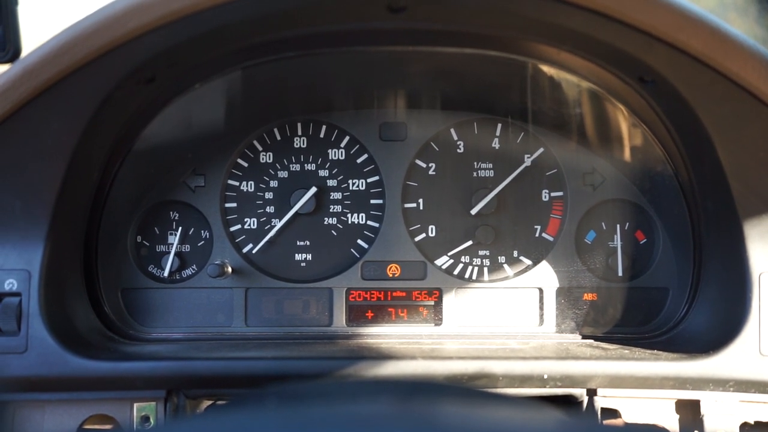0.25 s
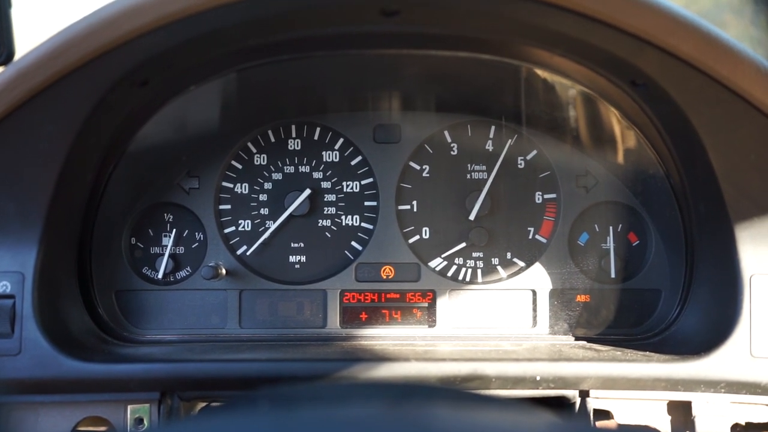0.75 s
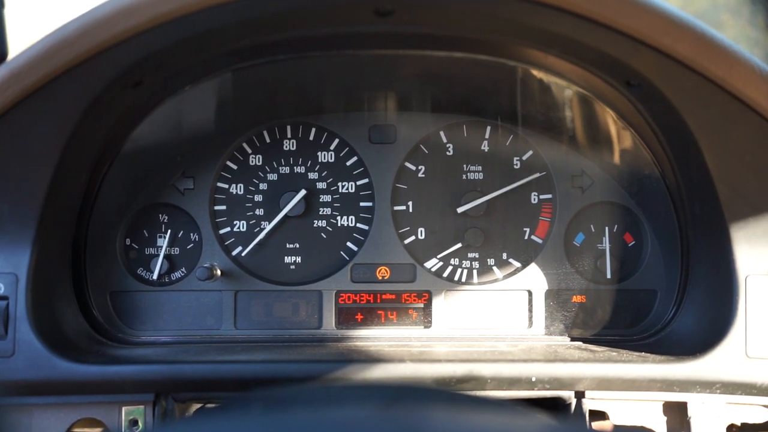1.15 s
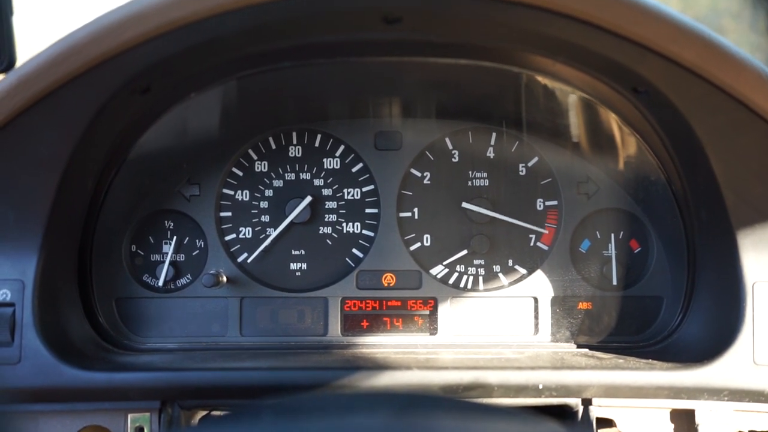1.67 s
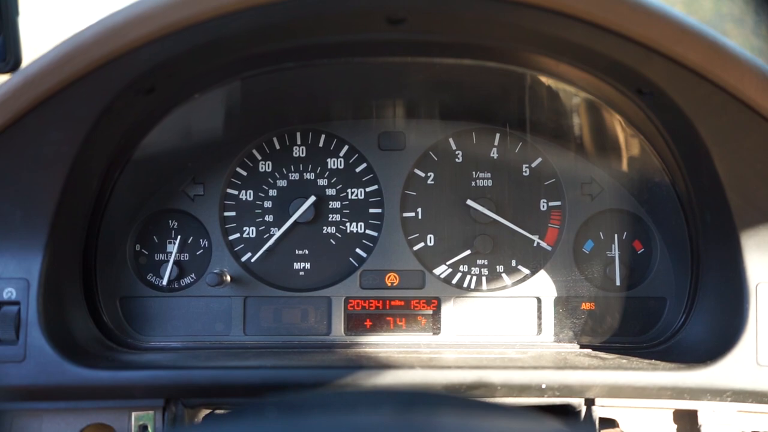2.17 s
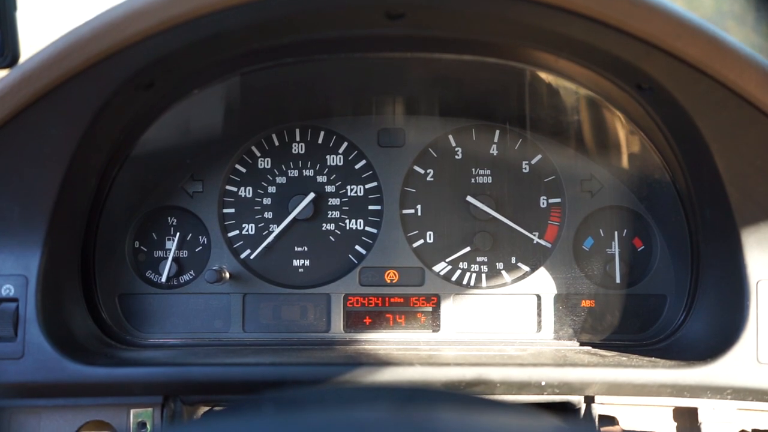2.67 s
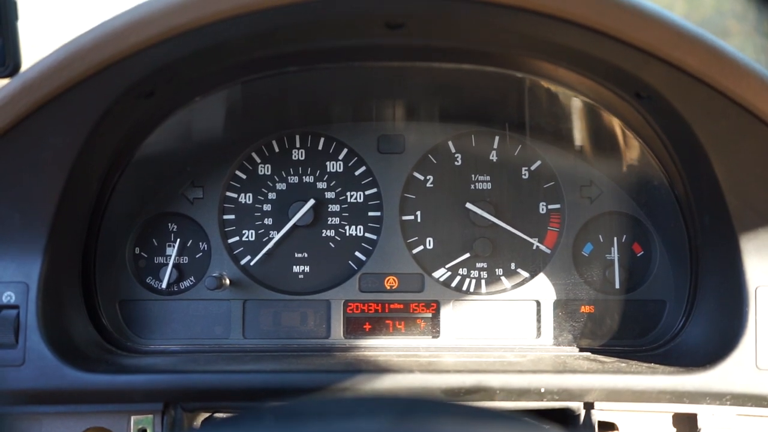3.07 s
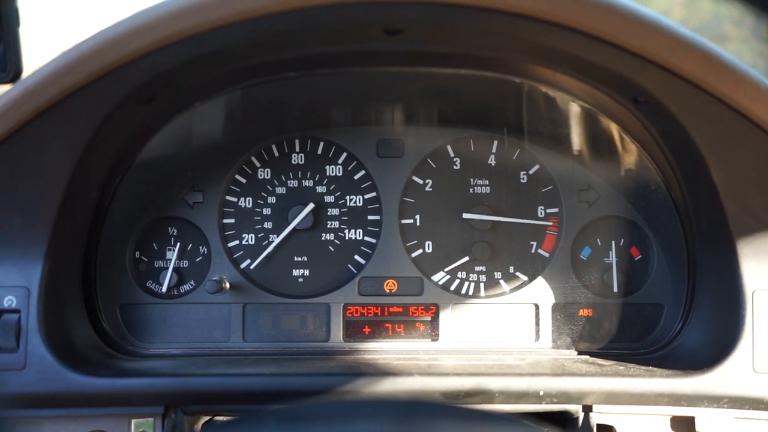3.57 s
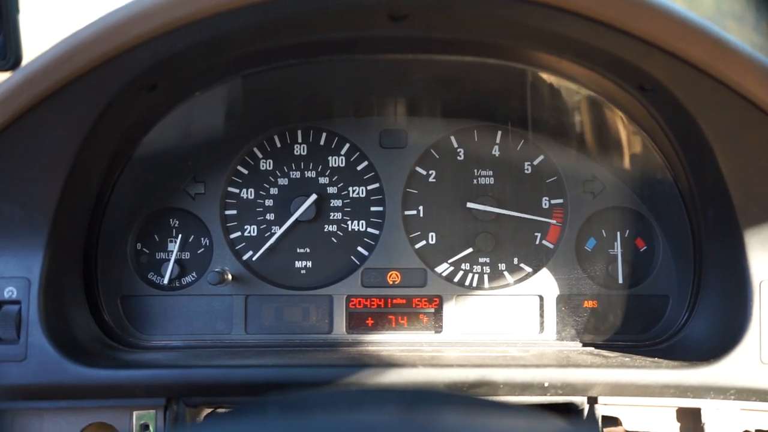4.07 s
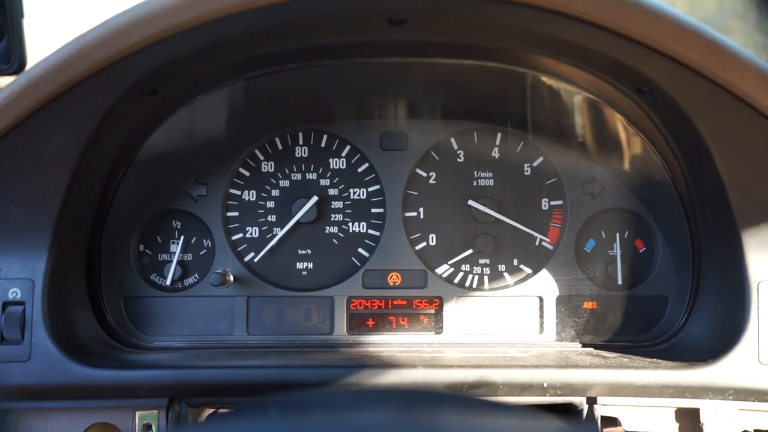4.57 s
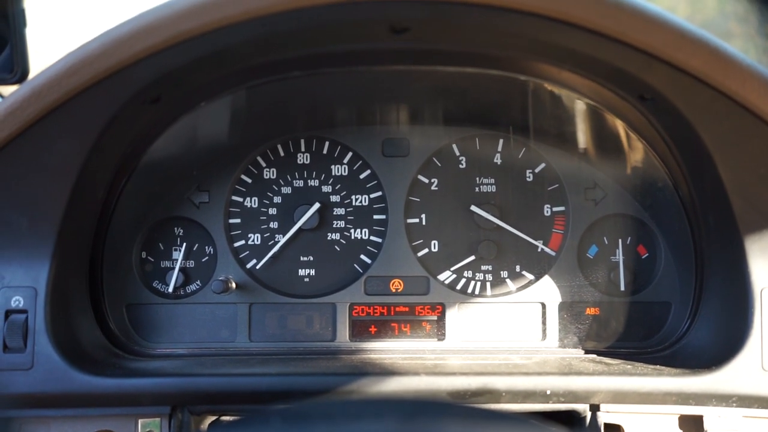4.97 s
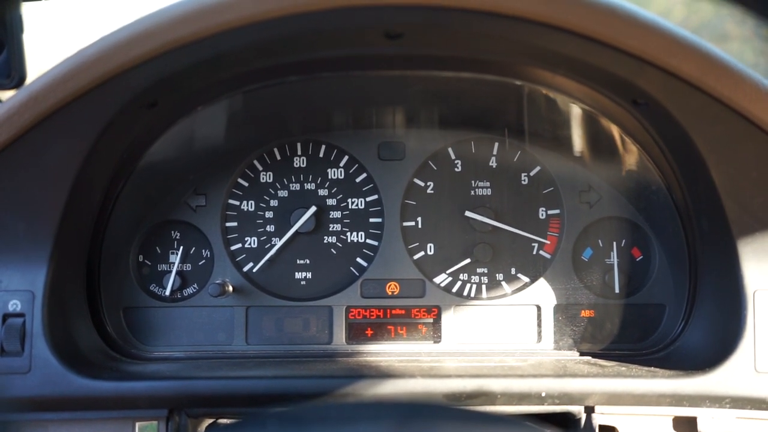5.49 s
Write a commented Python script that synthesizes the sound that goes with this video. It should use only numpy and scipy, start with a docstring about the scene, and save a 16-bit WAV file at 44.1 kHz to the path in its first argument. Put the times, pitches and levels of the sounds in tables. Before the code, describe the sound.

Heard from the driver's seat of a parked car, a loud six-cylinder engine coasts down briefly, burbles, then roars up to a long rapid stutter at the rev limiter. It sags, climbs back for another second of hammering, dips slightly and bounces again. Close cabin stereo, boomy bass, raspy exhaust and airy hiss.

```python
"""A straight-six with a loud exhaust is revved at standstill, heard from the driver's seat.
Sines at multiples of the engine's cycle rate make its note; shaped noise makes rasp and intake hiss.
Three times it falls on a closed throttle, climbs again and bounces off the rev limiter: there each
fuel cut thumps and each catch barks, as clicks that set exhaust and cabin resonances ringing.
Faint ticks and a low rumble, both of noise, lie beneath."""
import sys
import numpy as np
from scipy import signal
from scipy.fft import rfft, irfft, next_fast_len
from scipy.io import wavfile

SR = 44100
rng = np.random.default_rng(int(sys.argv[2]) if len(sys.argv) > 2 else 0)


def generate_wav(signal):
    """Clip the signal to [-1, 1] and save it as 16-bit WAV at the path in sys.argv[1]."""
    frames = np.transpose(np.atleast_2d(signal))
    scaled = np.clip(frames, -1, 1) * 32767
    pcm = np.round(scaled).astype(np.int16)
    wavfile.write(sys.argv[1], SR, pcm)


N = 252693
TIME = np.arange(N) / SR   # seconds

# Exhaust burbles as the throttle reopens. Each row: time in seconds, level in dB against a fuel cut.
BURBLES = [(.471, -3.5), (0.509, -0.5), (3.517, -11), (3.559, -2.5), (3.578, -6), (5.276, -7),
           (5.328, -3.5)]
# How wide the sound is at each pitch. Each row: pitch in Hz, side level minus middle level in dB.
WIDTH = [(30, -21), (125, -16), (300, -12), (600, -6), (1200, -3), (2200, 2), (4000, -.5), (15000, 0)]
# Stabs of the accelerator. Each row: fuel returns, throttle opens, first fuel cut and throttle closes,
# all in seconds, then limiter period in seconds, opening roar in dB.
STABS = [(.43, 0.529, 1.049, 2.89, .0638, 6.5), (3.53, 3.595, 3.856, 4.925, .0655, 0.5),
         (5.27, 5.322, 5.491, 5.75, .071, -1.5)]

# Four-stroke cycles per second at the start and on the limiter
START_HZ, LIMIT_HZ = 38.5, 58.6
# Rate at which the unfuelled engine's speed dies away, per second
DRAG_PER_S = 0.375
# The crank picks up this long after the throttle opens; the limiter acts this long after top speed
PICKUP_S, LIMITER_WAIT_S = 0.02, 0.02
# Unsteadiness as a share of crank speed: always, extra on the limiter, extra at a burble
WOBBLE, LIMITER_WOBBLE, BURBLE_WOBBLE = 0.0014, 0.00697, 0.0251
# Load from 0 to 1 when coasting, pulling freely and on the limiter, and the time it takes to follow
COAST_LOAD, PULL_LOAD, LIMITER_LOAD, LOAD_LAG_S = 0.31, 0.77, 0.54, 0.027

# Each bounce is a short burn ended by a fuel cut: its usual length, timing scatter and shortest length
BURN_S, CATCH_JITTER_S, CUT_JITTER_S, SHORTEST_BURN_S = 0.025, 0.0055, 0.004, 0.008
# Strength of an ordinary catch and its scatter
BARK_DB, BARK_SCATTER_DB = -2, 2.5

# A throttle snapped open roars loudest after this long; shares of that roar in each layer
ROAR_S, ROAR_IN_RASP, ROAR_IN_ORDERS, ROAR_IN_HISS = 0.075, 0.86, 0.8, 0.34
# Rasp: level at top speed without load, gain at full power, gain per octave of speed
RASP_DB, RASP_POWER_DB, RASP_DB_PER_OCTAVE = -42.5, 24, -1.5
# Intake hiss: level at top speed without load, gain at full load, gain per octave of speed
HISS_DB, HISS_LOAD_DB, HISS_DB_PER_OCTAVE = -49, 8, 8
# How strongly the alternation of burn and fuel cut moves the rasp and the firing note
RASP_CHOP_DB, FIRING_CHOP_DB = 5.5, 7

# Sound waves per cycle: one three-cylinder bank, and all six cylinders
ORDER_BANK, ORDER_FIRING = 3, 6
# What the boom and the firing note gain from no load to full load
BOOM_LOAD_DB, FIRING_LOAD_DB = 4.5, 17
# How far bank orders stand out: always, extra in the treble, at full load in the bass and in the treble
BANK_DB, BANK_TREBLE_DB, BANK_LOAD_DB, BANK_TREBLE_LOAD_DB = 3.5, 3.5, 11, 1

RIGHT_LAG = 5       # samples by which the sound reaches the right side later
CUTOFF_HZ = 15760   # top of the finished sound
FADE_IN_S = 0.004   # avoids a click at the start


def from_db(db):
    """Turn decibels into a gain."""
    return 10 ** (np.asarray(db) / 20)


def rms_one(x):
    """Scale to an rms (average strength) of 1."""
    return x / np.sqrt(np.mean(x ** 2) + 1e-20)


def at_hz(points, hz):
    """Read a table of pitch and value, with pitch on a log scale."""
    known_hz, value = np.transpose(points)
    return np.interp(np.log(hz), np.log(known_hz), value)


def drift(rate):
    """Smooth random wander of spread 1; a higher rate wanders faster."""
    step = 40   # samples between the computed points
    r = np.exp(-2 * np.pi * step * rate / SR)
    noise = rng.standard_normal(N // step + 2002)
    slow = signal.lfilter([1], [1, -2 * r, r * r], noise)[2000:]   # drop the filter's settling
    return np.interp(np.arange(N) / step, np.arange(len(slow)), rms_one(slow))


def lag(x, seconds):
    """Follow a signal with a delay that dies away exponentially."""
    r = np.exp(-1 / (seconds * SR))
    return signal.lfilter([1 - r], [1, -r], x + 1e-18)


def clicks(times, gains):
    """Place single-sample clicks at the given times."""
    at = np.clip(np.round(np.asarray(times) * SR).astype(int), 0, N - 1)
    return np.bincount(at, gains * np.ones(len(at)), N)


def ring(kicks, hz, t60):
    """A click of height 1 sets a sine of height 1 ringing, which falls by 60 dB in t60 seconds."""
    r = np.exp(-np.log(1000) / (t60 * SR))
    w = 2 * np.pi * hz / SR
    return signal.lfilter([0, np.sin(w)], [1, -2 * r * np.cos(w), r * r], kicks + 1e-18)


def tone(turns, apart):
    """A sine of rms 1 whose phase differs between the ears."""
    phase = 2 * np.pi * (turns % 1) + apart * np.array([[1], [-1]])
    return np.sqrt(2) * np.cos(phase.astype(np.float32))


def cabin_noise(spectrum, gate=1, lift_db=np.zeros_like):
    """Gated noise, coloured by a spectrum and resonances; the cabin spreads its treble between the ears."""
    size = next_fast_len(N)
    hz = np.maximum(np.fft.rfftfreq(size, 1 / SR), 1)
    lowest_hz, highest_hz = spectrum[0][0], spectrum[-1][0]
    skirts = np.minimum(1, np.minimum(hz / lowest_hz, highest_hz / hz)) ** 4   # fade beyond the table
    colour = from_db(at_hz(spectrum, hz) + lift_db(hz)) * skirts
    mid, side = rfft(rng.standard_normal((2, N)) * gate, size) * colour
    mid = irfft(mid, size)[:N]
    side = irfft(side * from_db(at_hz(WIDTH, hz)), size)[:N]
    return (mid + side * [[1], [-1]]) / np.std(mid)


def pipe_lift_db(hz):
    """Fixed pipe resonances lift whatever glides through them."""
    # Each row: centre in Hz, width in Hz, lift in dB.
    rasp_peaks = [(906, 66, 5.5), (1069, 78, 4), (1229.4, 33, 9), (1497, 130, 5.5), (1800, 61, 4.5)]
    return sum(db / (1 + (2 * (hz - centre) / width) ** 2) for centre, width, db in rasp_peaks)


def crank_speed():
    """The engine coasts down against drag, hangs as fuel returns, then climbs evenly to the limiter."""
    speed = START_HZ * np.exp(-DRAG_PER_S * TIME)
    for fuelled, opens, first_cut, closes, _, _ in STABS:
        caught_hz = np.interp(fuelled, TIME, speed)
        climb = np.interp(TIME, [opens + PICKUP_S, first_cut - LIMITER_WAIT_S], [caught_hz, LIMIT_HZ])
        coast = np.exp(-DRAG_PER_S * np.maximum(TIME - closes, 0))
        speed = np.where(TIME < fuelled, speed, climb * coast)
    return speed


def engine_load():
    """Load is high during a climb, held back by the limiter, low on a closed throttle."""
    extra = np.zeros(N)
    for _, opens, first_cut, closes, _, _ in STABS:
        extra[(TIME > opens) & (TIME < first_cut)] = PULL_LOAD - COAST_LOAD
        extra[(TIME >= first_cut) & (TIME < closes)] = LIMITER_LOAD - COAST_LOAD
    return COAST_LOAD + lag(extra, LOAD_LAG_S)


def opening_roar_db():
    """A throttle snapped open roars at once and settles again."""
    level_db = 0
    for _, opens, _, _, _, roar_db in STABS:
        age = (np.maximum(TIME - opens, 0) / ROAR_S) ** 2.3
        level_db = level_db + roar_db * age * np.exp(1 - age)
    return level_db


def on_limiter():
    """One while the limiter acts, otherwise zero."""
    return sum((TIME > first_cut) & (TIME < closes + period)
               for _, _, first_cut, closes, period, _ in STABS)


def limiter_catches():
    """The engine catches and is cut again, not quite evenly: rows of start s, burn length s, bark dB."""
    # The hardest catches. Each row: start in seconds, bark in dB.
    hard_catches = [(1.144, 6.5), (1.4, 6), (1.843, 3), (2.167, 4.5), (3.899, 6), (4.807, 5), (5.547, 2),
                    (5.682, 4)]
    beats = np.concatenate([first_cut + period * np.arange(1, round((closes - first_cut) / period) + 1)
                            for _, _, first_cut, closes, period, _ in STABS])
    early, late, strength = rng.standard_normal((len(beats), 3)).T
    start = beats - BURN_S + CATCH_JITTER_S * early
    bark_db = BARK_DB + BARK_SCATTER_DB * strength
    for s, db in hard_catches:
        nearest = np.argmin(np.abs(beats - BURN_S - s))
        start[nearest], bark_db[nearest] = s, db
    length = np.maximum(beats + CUT_JITTER_S * late - start, SHORTEST_BURN_S)
    return np.transpose([start, length, bark_db])


def limiter_flutter(burns, delay, burn, stretch, soften):
    """Positive while the cylinders burn, negative while fuel is cut, near zero away from the limiter."""
    since = TIME - delay
    burning = sum(from_db(0.18 * db) * ((since > s) & (since < s + burn + stretch * length))
                  for s, length, db in burns)
    return lag(lag(on_limiter() * (burning - 0.55), soften), soften)


def rumble():
    """A steady low rumble of noise."""
    # Each row: pitch in Hz, relative level in dB.
    rumble_colour = [(20, -14.5), (45, 2.5), (110, -3.5), (250, -4.5), (500, -18)]
    return from_db(-28) * cabin_noise(rumble_colour)


def ticks(decay=0.0079):
    """Short faint ticks in the cabin: bursts of treble noise that die away within hundredths of a second."""
    # Each row: time in seconds, level in dB.
    tick_list = [(0.403, -37), (3.48, -36), (5.2117, -36)]
    s, db = np.transpose(tick_list)
    envelope = lag(clicks(s, from_db(db)), decay) * decay * SR   # each starts at its full level
    return envelope * cabin_noise([(2600, -1), (3800, -2.0), (5000, -5.5), (8000, -17.0), (10000, -26)])


def rasp_level_db(cycle_hz, load):
    """The rasp grows with power, which is load times speed."""
    speed = cycle_hz / LIMIT_HZ
    power_db = RASP_POWER_DB * load * speed
    return RASP_DB + power_db + RASP_DB_PER_OCTAVE * np.log2(speed) + ROAR_IN_RASP * opening_roar_db()


def gas_noise(cycles, cycle_hz, load, burns):
    """Each firing lets out a puff of turbulent gas; the intake hisses more with load and speed."""
    # Colours of the two noises. Each row: pitch in Hz, relative level in dB.
    rasp_colour = [(220, -1), (320, 4), (430, 3.5), (570, -0.5), (700, 2.5), (820, -3.5), (1000, -4.5),
                   (1340, -9), (1800, -7), (2150, -12.5), (2500, -15.5)]
    hiss_colour = [(2000, -21), (2600, -0.5), (3200, 1), (3900, 3.5), (4800, -0.5), (6500, 0.5), (8000, -5),
                   (10000, -11), (13000, -19), (15700, -22)]
    turn = 2 * np.pi * cycles
    puffs = from_db(1.9 * np.cos(ORDER_FIRING * turn) + 0.37 * np.cos(ORDER_BANK * turn)
                    + 0.45 * np.cos(turn))
    chug = limiter_flutter(burns, delay=0.0013, burn=0.019, stretch=0.83, soften=0.0028)
    rasp_db = rasp_level_db(cycle_hz, load) + RASP_CHOP_DB * chug + 0.72 * drift(33)
    rasp = from_db(rasp_db) * cabin_noise(rasp_colour, puffs, pipe_lift_db)
    hiss_db = (HISS_DB + HISS_LOAD_DB * load + ROAR_IN_HISS * opening_roar_db()
               + HISS_DB_PER_OCTAVE * np.log2(cycle_hz / LIMIT_HZ) + 1.5 * chug + 0.75 * drift(30))
    hiss = from_db(hiss_db) * cabin_noise(hiss_colour, puffs ** 0.25)
    # rasp leans left, hiss leans right
    return rasp * from_db([[0.6], [-0.6]]) + hiss * from_db([[-0.8], [0.8]])


def exhaust_thumps(burns, scatter_db=1.7, bark_above_hz=300):
    """A catch kicks the gas outwards, a fuel cut sucks it back; neighbouring modes swing oppositely."""
    # Exhaust and cabin resonances. Each row: pitch in Hz, ringing time (60 dB fall) in seconds,
    # level in dB on a fuel cut, level in dB on a catch.
    pipe_modes = [(50.7, 0.078, -0.5, -2.5), (73.6, 0.085, -2, -11), (112.7, 0.34, -28.5, -16),
                  (144.6, 0.13, -7.5, -9), (161.6, 0.15, -19.5, -8.5), (196.3, 0.21, -19, -31),
                  (238.5, 0.12, -40, -20), (350, 0.13, -28, -23), (400, 0.092, -25, -13.5),
                  (487.6, 0.21, -33, -26.5)]
    start, length, bark_db = np.transpose(burns)
    burble_s, burble_db = np.transpose(BURBLES)
    cut_s = np.r_[start + length, [first_cut for _, _, first_cut, *_ in STABS]]
    out = np.zeros((2, N))
    for k, (hz, t60, cut_db, catch_db) in enumerate(pipe_modes):
        bark = hz > bark_above_hz   # the bark strength acts on the upper modes alone
        spread_db = scatter_db * (2 if bark else 1)
        catch_levels_db = catch_db + bark * bark_db + rng.normal(0, spread_db, len(start))
        catches = clicks(start, from_db(catch_levels_db))
        cuts = clicks(cut_s, from_db(cut_db + rng.normal(0, spread_db, len(cut_s))))
        burbles = clicks(burble_s, from_db(cut_db + burble_db))
        pan_db = 0.8 if bark else -0.35
        out += (-1) ** k * ring(catches - cuts - burbles, hz, t60) * from_db([[pan_db], [-pan_db]])
    return out


def boom_and_firing(cycles, cycle_hz, load, flutter):
    """The two main notes, bank boom and six-cylinder firing, swell as they glide through resonances."""
    # Levels at half load. Each row: pitch of the note in Hz, level in dB.
    boom_levels = [(103, -16.5), (112, -9.5), (122, -16), (142, -9.5), (152, -11), (160, -17), (168, -26.5),
                   (176, -27.5)]
    firing_levels = [(200, -19.5), (212, -23), (230, -14.5), (255, -17.5), (285, -24), (318, -30.5),
                     (338, -23), (352, -20)]
    boom_db = (at_hz(boom_levels, ORDER_BANK * cycle_hz) + BOOM_LOAD_DB * (load - 0.5)
               + 0.29 * drift(24))
    firing_db = (at_hz(firing_levels, ORDER_FIRING * cycle_hz) + FIRING_LOAD_DB * (load - 0.5)
                 + FIRING_CHOP_DB * flutter)
    boom = from_db(boom_db) * tone(ORDER_BANK * cycles, apart=0.042)
    firing = from_db(firing_db) * tone(ORDER_FIRING * cycles, apart=-0.26)
    return boom * from_db([[-0.5], [0.5]]) + firing * from_db([[1.9], [-1.9]])


def engine_orders(cycles, cycle_hz, load, flutter, count=40):
    """Sines at multiples of the cycle rate; every third, the bank rhythm, stands out, more under load."""
    # Levels of the orders beside the two main notes. Each row: pitch in Hz, level in dB.
    order_levels = [(30, -42.5), (52, -40.5), (70, -27), (112, -24.5), (150, -27.5), (200, -47), (290, -47),
                    (385, -24.5), (470, -36), (560, -51), (900, -50.5), (1250, -68), (1750, -57),
                    (2400, -70.5)]
    # What the bank orders gain without load. Each row: pitch in Hz, lift in dB.
    coast_lines = [(480, 0), (620, 10), (900, 3), (1200, 1.5), (1500, 6)]
    out = boom_and_firing(cycles, cycle_hz, load, flutter)
    grid_hz = np.geomspace(20, 3000, 600)
    body_db = at_hz(order_levels, grid_hz) + pipe_lift_db(grid_hz)
    roar_db = ROAR_IN_ORDERS * opening_roar_db()
    coasting = (1 - load) ** 2
    for k in range(1, count):
        if k in (ORDER_BANK, ORDER_FIRING):
            continue
        hz = k * cycle_hz
        high = np.interp(hz, [450, 1100], [0, 1])   # 0 in the bass, 1 in the treble
        if k % ORDER_BANK == 0:
            loaded_db = BANK_LOAD_DB * (1 - high) + BANK_TREBLE_LOAD_DB * high
            accent_db = (BANK_DB + BANK_TREBLE_DB * high + coasting * at_hz(coast_lines, hz)
                         + loaded_db * load ** 2)
        else:
            accent_db = -1.5 * load - 4 * high * (1 - load)
        # combustion makes the high orders uneven; on a closed throttle they run cleaner
        unsteady = (0.3 + 0.7 * high) * (0.35 + 0.65 * load)
        level_db = (np.interp(hz, grid_hz, body_db) + accent_db + high * roar_db + 3.25 * flutter
                    + 6.97 * unsteady * drift(13))
        turns = k * cycles + rng.random() + 0.16 * unsteady * drift(16)
        apart = np.arctan(from_db(at_hz(WIDTH, hz))) * rng.choice([-1, 1])
        out = out + from_db(level_db) * tone(turns, apart)
    return out


def scene():
    """Crank speed, load and the limiter drive the engine layers; ticks and rumble are added."""
    # the crank shudders at each burble
    stumble = sum(np.exp(-((TIME - s) / 0.03088) ** 2) for s, db in BURBLES)
    wobble = WOBBLE + LIMITER_WOBBLE * on_limiter() + BURBLE_WOBBLE * stumble
    cycle_hz = crank_speed() * (1 + wobble * drift(22.55))
    cycles = np.cumsum(cycle_hz) / SR
    load, burns = engine_load(), limiter_catches()
    flutter = limiter_flutter(burns, delay=-0.0063, burn=0.015, stretch=0.61, soften=0.0013)
    background = rumble() + ticks()
    exhaust = gas_noise(cycles, cycle_hz, load, burns) + exhaust_thumps(burns)
    left, right = background + exhaust + engine_orders(cycles, cycle_hz, load, flutter)
    return np.array([left, np.r_[np.zeros(RIGHT_LAG), right[:-RIGHT_LAG]]])


def record(dry):
    """The sound fades in, the lowest bass is shed, the loudest peaks are rounded, the top is cut."""
    top = 0.92   # height that the rounded peaks approach
    faded = dry * np.minimum(TIME / FADE_IN_S, 1)
    x = signal.sosfilt(signal.butter(1, 10, "high", fs=SR, output="sos"), faded)
    rounded = x / (1 + (x / top) ** 6) ** (1 / 6)
    return signal.sosfilt(signal.ellip(10, 0.1, 80, CUTOFF_HZ, fs=SR, output="sos"), rounded)


dry = scene()
out = record(dry)
generate_wav(out)
```